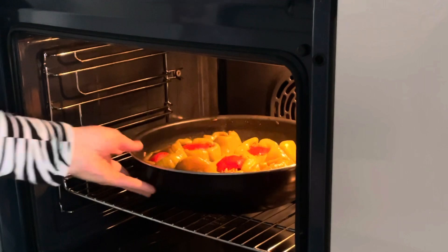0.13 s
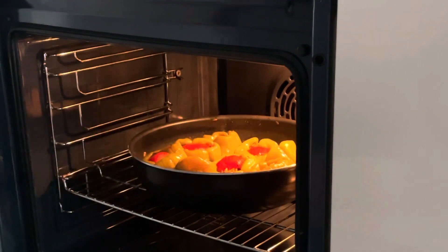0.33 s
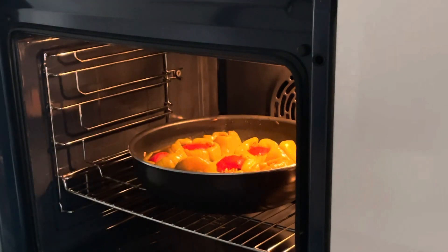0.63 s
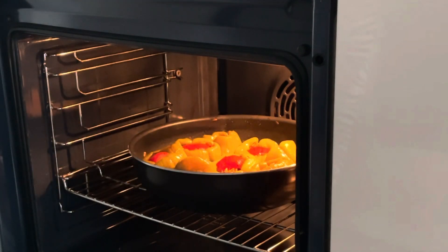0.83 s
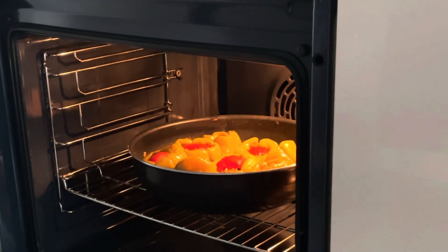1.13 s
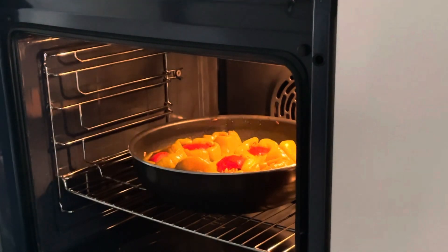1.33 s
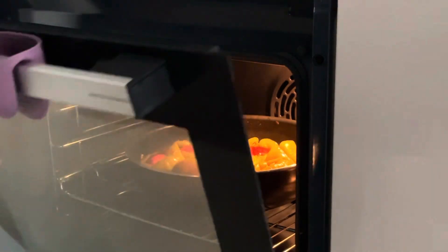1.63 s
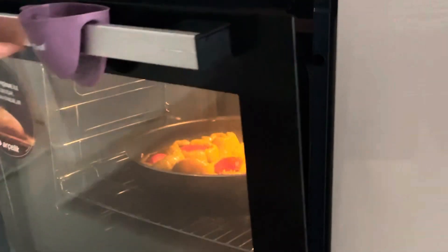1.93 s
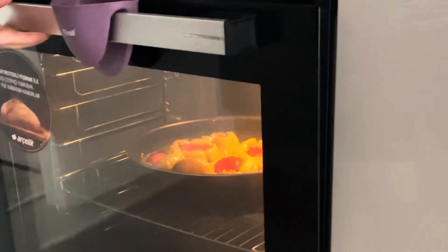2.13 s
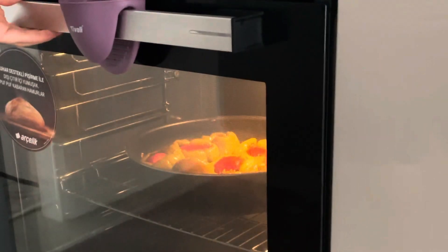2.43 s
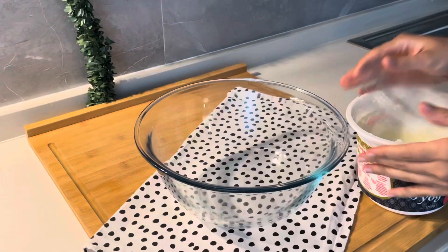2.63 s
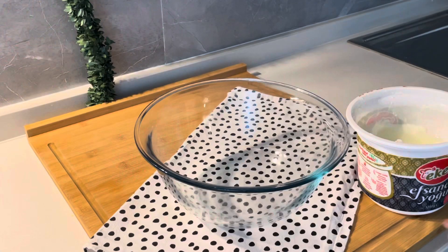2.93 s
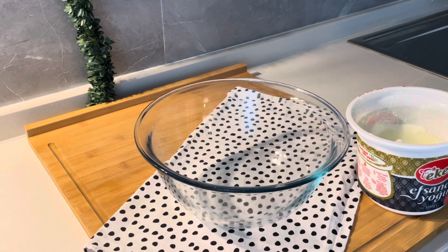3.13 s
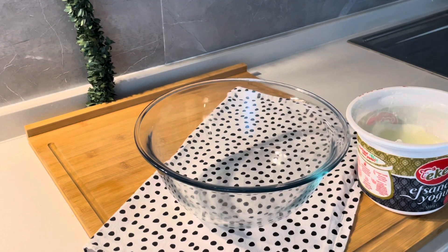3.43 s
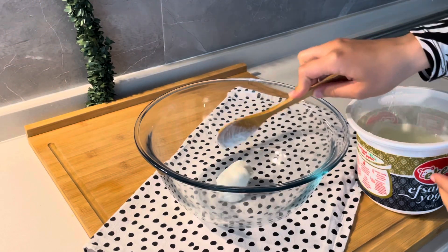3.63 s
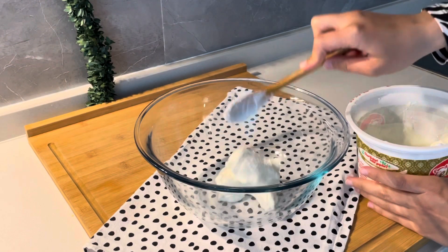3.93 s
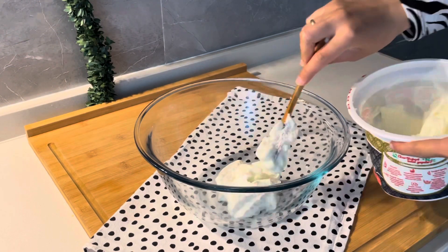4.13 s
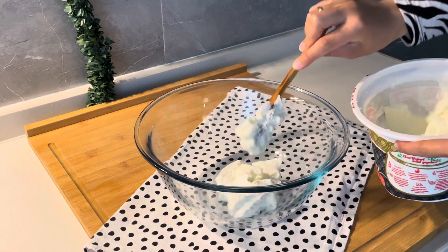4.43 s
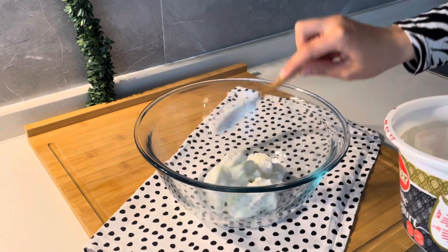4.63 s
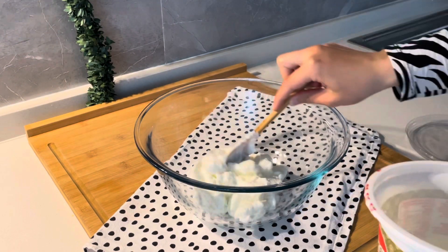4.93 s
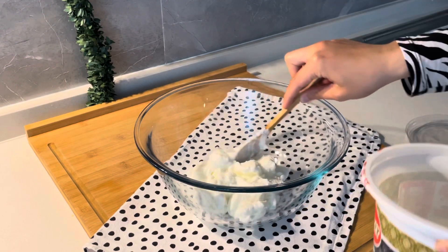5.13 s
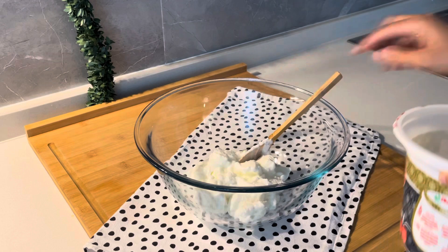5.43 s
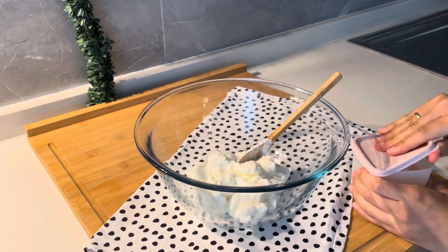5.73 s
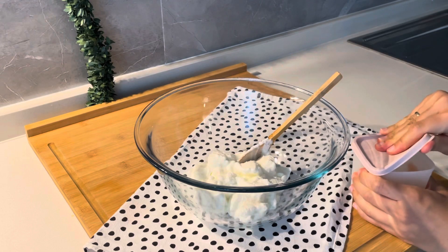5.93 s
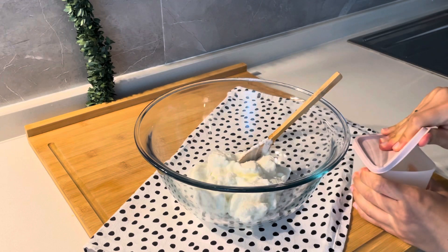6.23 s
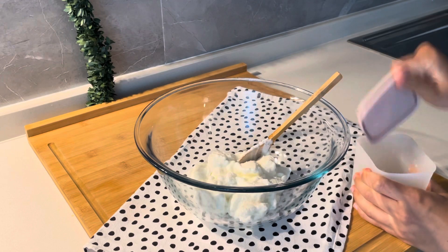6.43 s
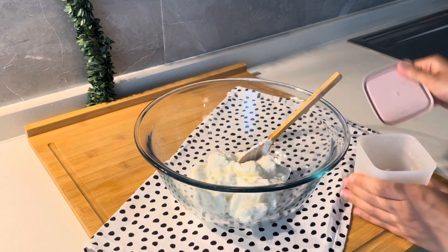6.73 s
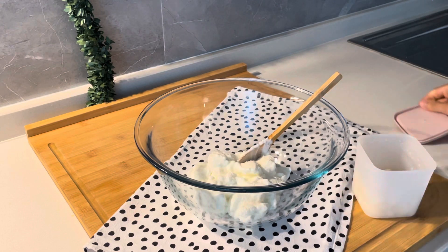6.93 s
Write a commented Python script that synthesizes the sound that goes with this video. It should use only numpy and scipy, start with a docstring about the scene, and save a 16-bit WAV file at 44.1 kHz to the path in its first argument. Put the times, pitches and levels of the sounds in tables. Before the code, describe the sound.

Close stereo pickup in a small, lightly reverberant kitchen. Warm fan air and motor hum open the scene, dulled after a heavy oven door booms. An abrupt cut leaves faint room hum, then finger taps and a burst of hard plastic tub knocks with rubbing. Soft spoon ticks follow, then a bright ringing clink on a glass bowl, cut short. A box lid snaps off in rapid hollow pops and is laid down with dry clacks.

```python
"""A quiet kitchen at two microphone ports: an oven fan rushes until its door swings up, knocks and shuts it in.
Then a plastic tub is handled, tapped and knocked on a wooden board, a spoon taps and clinks on a glass bowl.
Last the lid of a plastic box pops loose and is laid down. Beds are shaped noise and sines, blows are noise
cracks over decaying modes, rubs are noise through a drifting resonance. Three times every ring stops dead."""
import sys
import numpy as np
from scipy import signal
from scipy.fft import rfft, irfft
from scipy.io import wavfile
from scipy.ndimage import uniform_filter1d

SR = 44100
rng = np.random.default_rng(int(sys.argv[2]) if len(sys.argv) > 2 else 0)


def log_audio(samples):
    """Write samples as a 16-bit WAV file to the path given in sys.argv[1]."""
    # one column per channel
    frames = np.atleast_2d(samples).T
    # limit to full scale, then quantise
    limited = np.clip(frames, -1, 1)
    pcm = np.round(limited * 32767).astype(np.int16)
    wavfile.write(sys.argv[1], SR, pcm)


N = 312228
HUM_HZ = 100  # base of the electric hum

# Moments where near sounds and their echoes stop dead: time_s
STOPS = [2.483, 3.478, 5.503]
# Ringing modes of the tapping spoon: pitch_hz, relative_level_db, t60_s
SPOON_MODES = [(2794, 0, .07), (3435, -6, .03), (4161, -8, .03)]


def gain_of(db):
    """Decibels to a factor."""
    return 10 ** (np.asarray(db) / 20)


def evened(x):
    """Scaled to rms 1."""
    return x / np.sqrt(np.mean(x ** 2) + 1e-20)


def read(points, hz):
    """Reads a curve of (pitch, value) points on a log frequency axis."""
    f, value = np.transpose(points)
    return np.interp(np.log(hz + 1), np.log(f + 1), value)


def octaves(hz):
    """Distance from 2 kHz in octaves, the pivot of every brightness tilt."""
    return np.log2(np.clip(hz, 50, 16000) / 2000)


def add(mix, s, sound):
    """Mixes a sound of one or two channels in at a time."""
    part = mix[:, round(s * SR):][:, :sound.shape[1]]
    part += sound[:, :part.shape[1]]


def noise(spectrum, patchy_db=2.0, size=1024):
    """Coloured noise from random short-time spectra whose strength drifts in patches."""
    hop = size // 4
    frames = N // hop + 5
    hz = np.fft.rfftfreq(size, 1 / SR)[:, None]
    real, imag, patches = rng.standard_normal((frames, len(hz), 3)).T
    patches = uniform_filter1d(uniform_filter1d(patches, 9, 0), 9, 1)
    colour = gain_of(read(spectrum, hz))
    z = (real + 1j * imag) * colour / np.linalg.norm(colour)
    z = z * gain_of(patchy_db * evened(patches))
    return signal.istft(z, nperseg=size, noverlap=size - hop)[1][:N] / np.sqrt(6)


def tone(hz):
    """A sine of steady pitch whose strength wavers a little."""
    waver = evened(uniform_filter1d(rng.standard_normal(N), 8000))
    return np.sqrt(2) * (1 + 0.13 * waver) * np.sin(2 * np.pi * hz * np.arange(N) / SR)


def bump(hz, centre_hz, width_hz, db):
    """Power of one resonance across frequency."""
    return gain_of(2 * db) / (1 + (2 * (hz - centre_hz) / width_hz) ** 2)


def resonate(x, hz, width_hz):
    """A moving resonance of peak gain 1: shifts the curve hz down to zero, smooths, and shifts back."""
    turn = np.exp(2j * np.pi * np.cumsum(hz) / SR)
    pole = np.exp(-np.pi * width_hz / SR)
    return 2 * (turn * signal.lfilter([1 - pole], [1, -pole], x / turn)).real


def ring(modes, bright, contact_s, give):
    """Sines held during the contact and dying after it, peak 1; soft things give, which shifts the modes."""
    t = np.arange(SR // 2) / SR
    shifts = 1 + give * rng.standard_normal(len(modes))
    x = 0
    for (hz, db, t60), shift in zip(modes, shifts):
        held = contact_s * min(1, 900 / hz)  # a soft contact feeds the high modes only at first
        level_db = db + bright * octaves(hz) - 60 * np.maximum(t - held, 0) / t60
        x = x + gain_of(level_db) * np.sin(2 * np.pi * hz * shift * t)
    x = x * np.minimum(t / 0.00039, 1)  # the push builds up over a moment
    return x / abs(x).max()


def strike(span, blows, modes, bright_db, dulling, contact_s, stretch, give, pan_db):
    """Each blow in the span is a rough contact crack over a ring; its fullness sets brightness and length.

    bright_db is per octave and loses dulling per dB of ring; contact_s grows by exp(stretch) per dB of ring;
    give is the random share by which modes shift; pan_db is left over right.
    """
    # Colour of two hard faces meeting: pitch_hz, relative_level_db per Hz
    crack_colour = [(150, -16.5), (400, 1.5), (1900, -0.5), (5000, 1.5), (8300, -2), (11000, -2.5),
                    (13500, -20.5), (16500, -27)]
    hollow_t60_s, body_db, body_width = .013, 12, .08  # modes also colour the crack; width as share of pitch
    out, t = np.zeros((2, N)), np.arange(SR // 2) / SR
    hz = np.fft.rfftfreq(len(t), 1 / SR)
    for s, db, ring_db, *hollow in blows:
        if not span[0] - .004 <= s < span[1] - .004:
            continue
        body = modes + [(f, 0, hollow_t60_s) for f in hollow]
        bright = bright_db - dulling * ring_db
        contact = contact_s * np.exp(stretch * ring_db)
        power = 1 + sum(bump(hz, f, body_width * f, body_db + mode_db) for f, mode_db, _ in body)
        colour = np.sqrt(power) * gain_of(read(crack_colour, hz) + bright * octaves(hz))
        crack = evened(irfft(rfft(rng.standard_normal(len(t))) * colour)) / 2
        crack = crack * np.exp(-t / (.8 * contact)) * np.minimum(t / .0008, 1)
        share = gain_of(ring_db)
        blow = (crack + share * ring(body, bright, contact, give)) / np.sqrt(1 + share ** 2)
        add(out, s, gain_of(db) * blow * gain_of([[pan_db / 2], [-pan_db / 2]]))
    return out


def still_air():
    """Faint room noise, partly shared by the ports and partly opposed, with the hum of appliances."""
    # Colour of the air that both ports share: pitch_hz, relative_level_db per Hz
    shared_colour = [(25, -15.5), (65, -0.5), (130, -5.5), (250, -14), (500, -18), (1000, -25),
                     (1900, -30.5), (3000, -41.5), (4600, -38.5), (5800, -48), (7250, -35), (7800, -64),
                     (8800, -59), (9600, -45.5), (12400, -43.5), (14000, -61)]
    # Colour of the air that differs between ports: pitch_hz, relative_level_db per Hz
    unlike_colour = [(25, -11), (100, -24), (300, -15), (1400, -28), (3300, -46), (6000, -48), (7300, -34),
                     (10000, -51), (15000, -56)]
    # Hum partials: multiple of HUM_HZ, level_db rms
    hum_partials = [(1, -54.5), (3, -59)]
    hum = sum(gain_of(db) * tone(k * HUM_HZ) for k, db in hum_partials)
    alike = gain_of(-42) * noise(shared_colour) + hum
    unlike = gain_of(-48.5) * noise(unlike_colour)
    return np.array([alike + unlike, alike - unlike])


def oven_fan():
    """Rushing air with the hum and the tone of the motor, louder on the left."""
    # Colour of the rush that both ports share: pitch_hz, relative_level_db per Hz
    shared_colour = [(25, -58), (70, 7), (130, -7.5), (270, -8.5), (450, -7.5), (860, -10), (2000, -22.5),
                     (4000, -33.5), (6500, -42), (7250, -39), (10700, -45.5), (13000, -60), (14200, -81)]
    # Colour of the rush that differs between ports: pitch_hz, relative_level_db per Hz
    unlike_colour = [(25, -29), (101, -2), (150, -22.5), (978, -15), (9270, -47), (15000, -64)]
    # Loudness of the fan as the door shuts it in: time_s, level_db
    fan_level = [(0, -35.5), (1.45, -37), (1.8, -39), (2.05, -41.5), (2.3, -48), (2.485, -43.5)]
    hum_db, motor_hz, motor_db, unlike_db = -19, 188, -16.5, -5  # levels against the fan level
    alike = noise(shared_colour) + gain_of(hum_db) * tone(HUM_HZ) + gain_of(motor_db) * tone(motor_hz)
    unlike = gain_of(unlike_db) * noise(unlike_colour)
    # as good as silent after the last point
    level = gain_of(np.interp(np.arange(N) / SR, *np.transpose(fan_level), right=-140))
    return np.array([alike + unlike, alike - unlike]) * level * gain_of([[.9], [-.9]])


def ticks(span):
    """Small wet and dry ticks of hands and spoon: contact cracks with hardly any ring."""
    # Ticks: start_s, level_db, brightness_db per octave
    small_ticks = [(2.952, -42, 17), (3.986, -47.5, 6), (4.671, -39, 14), (4.903, -41, 12), (5.755, -40, 8),
                   (6.115, -48, 5)]
    return sum(strike(span, [(s, db, -22)], SPOON_MODES, bright_db=bright, dulling=0, contact_s=.004,
                      stretch=0, give=.02, pan_db=-.6) for s, db, bright in small_ticks)


def rubbing():
    """Rubs of hands, plastic and spoon, also a low thump and the door's rough tail, as noise through a
    drifting resonance, roughened by uneven level flutter."""
    # Rubs, thump and door tail: start_s, hold_s, level_db before the flutter,
    # resonance_hz (centre of its drift), resonance_width_hz, brightness_db per octave
    strokes = [(.685, 0.052, -42.5, 327, 259, -9), (1.486, 0.051, -38, 1930, 900, -7),
               (2.489, 0.064, -51.5, 2190, 510, 2), (2.569, 0.017, -44, 800, 150, 1),
               (2.788, 0.075, -60.5, 2900, 353, 0), (2.949, 0.16, -61.5, 2720, 400, 1.5),
               (3.16, 0.088, -55, 2620, 500, 4.5), (3.233, 0.0045, -38, 2010, 1200, 1),
               (3.312, 0.013, -53, 1356, 50, 1.5), (3.312, 0.084, -45, 2310, 140, -1.5),
               (3.434, 0.055, -40, 1640, 250, -3), (4.0, 0.077, -72, 4550, 1500, -0.5),
               (5.2, 0.064, -68, 6000, 2000, -1.5), (5.411, 0.058, -52, 1870, 300, -6),
               (5.503, 0.086, -54.5, 3020, 900, -2.5), (6.312, 0.022, -29.5, 950, 250, -2.5),
               (6.388, 0.043, -38, 845, 250, -3), (6.467, .03, -37.5, 870, 300, -5),
               (6.507, 0.024, -38, 920, 199, -4), (6.615, 0.1, -56, 835, 200, -1),
               (6.841, 0.032, -41.5, 1590, 300, -0.5), (6.951, 0.018, -33, 1820, 200, -1),
               (7.029, .05, -44.5, 1820, 110, 1)]
    # Colour of the plain noise: pitch_hz, relative_level_db per Hz
    plain_colour = [(200, -12), (600, 2.5), (2000, -1.5), (6500, -1.5), (8300, -9.5), (11000, -3),
                    (13500, -12), (15500, -35)]
    rise_db_per_s, fade_db_per_s = 900, 209
    resonance_db, upper_db, upper_ratio = 20, -6, 1.8  # resonance 100 Hz wide; the next one against it
    wander, wander_s = .45, .015  # drift of the resonance: share of its width, time scale
    out, t, hz = np.zeros((2, N)), np.arange(SR) / SR - .05, np.fft.rfftfreq(SR, 1 / SR)
    smooth = round(wander_s * SR)
    for start, hold, db, resonance_hz, width_hz, bright in strokes:
        top_db = resonance_db - 10 * np.log10(width_hz / 100)  # a wider resonance stands out less
        colour = gain_of(read(plain_colour, hz) + bright * octaves(hz))
        plain = irfft(rfft(rng.standard_normal(SR)) * colour)
        drift = uniform_filter1d(uniform_filter1d(rng.standard_normal(SR), smooth), smooth)
        pitch = resonance_hz + wander * width_hz * np.tanh(evened(drift))
        resonant = resonate(plain, pitch, width_hz)
        resonant = resonant + gain_of(upper_db) * resonate(plain, upper_ratio * pitch, width_hz)
        level_db = db - rise_db_per_s * np.maximum(-t, 0) - fade_db_per_s * np.maximum(t - hold, 0)
        before_stop = start + t < min([stop for stop in STOPS if stop > start] + [N])
        stroke = evened(1.5 * plain + gain_of(top_db) * resonant)
        add(out, start + t[0], (stroke * gain_of(level_db) * before_stop)[None])
    flutter = evened(uniform_filter1d(rng.standard_normal(N), 150))
    return out * gain_of(3 * flutter)


def oven_door(span):
    """The door meets its catch with a short bright rattle, and its heavy panel booms."""
    # Catch blows: start_s, level_db, ring_over_crack_db
    catch_blows = [(1.482, -27, -6.5)]
    # Modes of the catch: pitch_hz, relative_level_db, t60_s
    catch_modes = [(2050, -4, .025), (2650, -1, .02), (3100, 0, .02), (3500, -1, .02)]
    # Door blows: start_s, level_db, ring_over_crack_db
    door_blows = [(1.499, -17, -3), (2.447, -38.5, 23)]
    # Modes of the door: pitch_hz, relative_level_db, t60_s
    door_modes = [(71.4, -4, 0.12), (123, -3.5, 0.32), (204.5, 0, 0.11), (327, -0.5, 0.05),
                  (566, 0.5, 0.062), (980, -9, 0.096)]
    catch = strike(span, catch_blows, catch_modes, bright_db=-3.5, dulling=0, contact_s=.014,
                   stretch=0, give=.02, pan_db=1.5)
    return catch + strike(span, door_blows, door_modes, bright_db=-6.5, dulling=-.3, contact_s=.022,
                          stretch=-.02, give=.02, pan_db=1.5)


def tub(span):
    """Light plastic with short modes, tapped by fingers and knocked hard."""
    # Finger taps: start_s, level_db, ring_over_crack_db
    finger_taps = [(2.573, -45, 15), (2.612, -31, -8), (2.794, -45.5, 15)]
    # Knocks of the tub: start_s, level_db, ring_over_crack_db
    tub_blows = [(3.223, -16, -7), (3.308, -20, -14), (3.394, -42, -17), (3.41, -30.5, -17),
                 (3.419, -26, -5), (3.437, -20, 8), (3.47, -23, 0)]
    # Modes of the tub: pitch_hz, relative_level_db, t60_s
    tub_modes = [(800, -5, .04), (1360, -6, .05), (1780, 0, .03), (2330, -2, .04), (3050, -5, .02),
                 (4800, -4, .015), (5300, -8, .015)]
    taps = strike(span, finger_taps, tub_modes, bright_db=-4, dulling=.6, contact_s=.006,
                  stretch=.01, give=.02, pan_db=1.2)
    return taps + strike(span, tub_blows, tub_modes, bright_db=3.2, dulling=.05, contact_s=.008,
                         stretch=.001, give=.02, pan_db=1.2)


def wooden_board(span):
    """Low, quickly damped modes of the board under a blow."""
    # Board blows: start_s, level_db, ring_over_crack_db
    board_blows = [(3.226, -27.5, 17.5), (5.503, -31, -6)]
    # Modes of the board: pitch_hz, relative_level_db, t60_s
    board_modes = [(67.4, 5.5, 0.33), (209.3, 11.5, 0.072), (463, 1, 0.0043)]
    return strike(span, board_blows, board_modes, bright_db=-3, dulling=-.4, contact_s=.012,
                  stretch=.03, give=.01, pan_db=1.5)


def spoon(span):
    """A bright tap with the few high modes of the spoon."""
    # Spoon taps: start_s, level_db, ring_over_crack_db
    spoon_taps = [(3.567, -38, -6)]
    return strike(span, spoon_taps, SPOON_MODES, bright_db=4, dulling=0, contact_s=.008,
                  stretch=0, give=0, pan_db=.6)


def spoon_on_glass_bowl(span):
    """Clinks of a spoon on a glass bowl: long glass modes, some beating in pairs, and short spoon modes."""
    # Clinks: start_s, level_db, ring_over_crack_db
    clinks = [(5.321, -22, 2), (5.3641, -29, 0), (5.388, -38, -8)]
    # Long modes of the glass and short modes of the spoon (1850 and 3400 Hz):
    # pitch_hz, relative_level_db, t60_s
    clink_modes = [(495, -14, .8), (511, -9.5, 1.2), (1319, 0, .65), (1332, -11, 1.0), (1850, -4, .02),
                   (2438, -10, 2.5), (3400, -7, .03), (3792, -7, .45), (3808, -7, .45), (5313, -6, .16),
                   (7050, -14, .13)]
    return strike(span, clinks, clink_modes, bright_db=-.2, dulling=-.05, contact_s=.0056,
                  stretch=.01, give=0, pan_db=-1.5)


def laid_lid(span):
    """The loose lid clacks on the counter with short plastic modes."""
    # Lid blows: start_s, level_db, ring_over_crack_db
    lid_blows = [(6.833, -15.5, -2.5), (6.941, -14.5, -6), (6.952, -17, -4), (7.001, -22, -8),
                 (7.013, -13, -10), (7.025, -16, -6)]
    # Modes of the lid: pitch_hz, relative_level_db, t60_s
    lid_modes = [(1320, -2, .03), (1660, -2, .04), (1850, -2, .04), (2800, -5, .025), (3280, -3, .025),
                 (4700, -8, .015)]
    return strike(span, lid_blows, lid_modes, bright_db=1.2, dulling=.15, contact_s=.007,
                  stretch=.001, give=.02, pan_db=.6)


def box_pops(span):
    """The lid snaps off in pops; the air in the box adds a hollow mode, mostly higher as the lid lifts."""
    # Pops: start_s, level_db, ring_over_crack_db, hollow_hz
    pops = [(6.277, -15, 5, 640), (6.283, -14, 12, 590), (6.291, -1.5, 9.5, 782), (6.319, -11.5, 8, 800),
            (6.346, -16, -1, 880), (6.372, -14, -4, 900), (6.405, -18.5, -3, 800), (6.431, -23, -1, 820),
            (6.493, -21, -1, 900), (6.524, -28, 2, 900), (6.538, -25, 0, 950)]
    # Modes of the box: pitch_hz, relative_level_db, t60_s
    box_modes = [(450, -14, .02), (580, -13, .025), (1160, -11, .015), (2050, -18, .012), (2500, -5, .014),
                 (3890, -11, .01), (4820, -17, .01)]
    return strike(span, pops, box_modes, bright_db=4.2, dulling=.8, contact_s=.0026,
                  stretch=.11, give=.012, pan_db=-2.2)


def ports(x):
    """The two ports hear a near sound with a phase gap that varies with pitch, and not equally loud."""
    # Phase gap: pitch_hz, left_lead_radians
    phase_gap = [(0, 0), (6000, 0.7), (8300, -3.5), (9600, -4.5), (11000, -4), (13500, -9)]
    # Loudness gap: pitch_hz, left_over_right_db
    level_gap = [(60, -2.5), (550, 2.5), (1650, 5), (4970, 5), (15000, -2)]
    hz = np.fft.rfftfreq(N, 1 / SR)
    half = np.exp(.5j * read(phase_gap, hz)) * gain_of(read(level_gap, hz) / 2)
    return irfft(rfft(x) * [half, 1 / half], N)


def kitchen(x):
    """Echo of sparse taps of random sign, each band dying at its own speed, other taps for each port."""
    # Decay of the room: pitch_hz, t60_s
    room_decay = [(100, 0.61), (700, 0.45), (3000, .45), (7000, 0.2), (14000, 0.1)]
    taps = np.zeros((2, SR // 2))
    at = np.arange(120, SR // 2 - 20, 20)
    at = at + rng.integers(0, 20, (2, len(at)))
    np.put_along_axis(taps, at, rng.choice([-1., 1.], at.shape), 1)
    hz, t, z = signal.stft(taps, SR, nperseg=256)
    z *= gain_of(-60 * t / read(room_decay, hz)[:, None])
    alike = np.clip(500 / (hz + 500), 0, 1)[:, None]  # long waves reach both ports alike
    z[1] = alike * z[0] + np.sqrt(1 - alike ** 2) * z[1]
    tail = signal.istft(z, SR, nperseg=256)[1]
    tail = tail / np.linalg.norm(tail[0])
    return signal.fftconvolve(x.mean(0)[None], tail, axes=1)[:, :N]


def scene():
    """Near sounds and their echoes play in spans over the beds; at each stop what still rings is gone."""
    room_db = -9  # echo against the near sound
    sources = [ticks, oven_door, tub, wooden_board, spoon, spoon_on_glass_bowl, laid_lid, box_pops]
    out, t, rubs = still_air() + oven_fan(), np.arange(N) / SR, rubbing()
    for start, end in zip([0] + STOPS, STOPS + [N / SR + 1]):
        near = rubs * (t >= start) + sum(source((start, end)) for source in sources)
        heard = ports(near) + gain_of(room_db) * kitchen(near)
        out += heard * np.clip((end - t) / .002, 0, 1) * (t > start - .01)
    return out


def record(dry):
    """The small microphone drops the deepest bass; a steep filter then ends the treble."""
    thin = signal.sosfilt(signal.butter(4, 45, "highpass", fs=SR, output="sos"), dry)
    band_limit = signal.firwin(511, 16400, window=("kaiser", 9), fs=SR)  # edge in Hz
    return signal.oaconvolve(thin, band_limit[None], "same")


dry = scene()
out = record(dry)
log_audio(out)
```